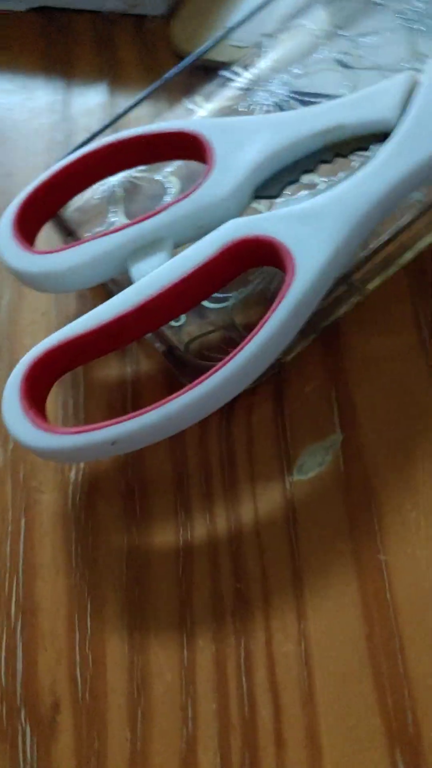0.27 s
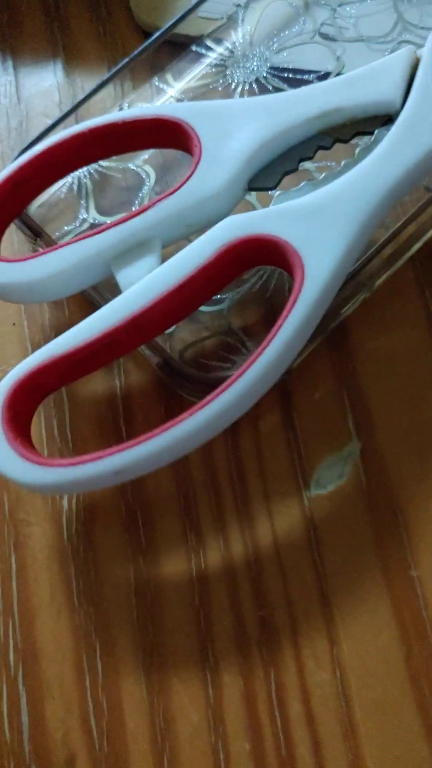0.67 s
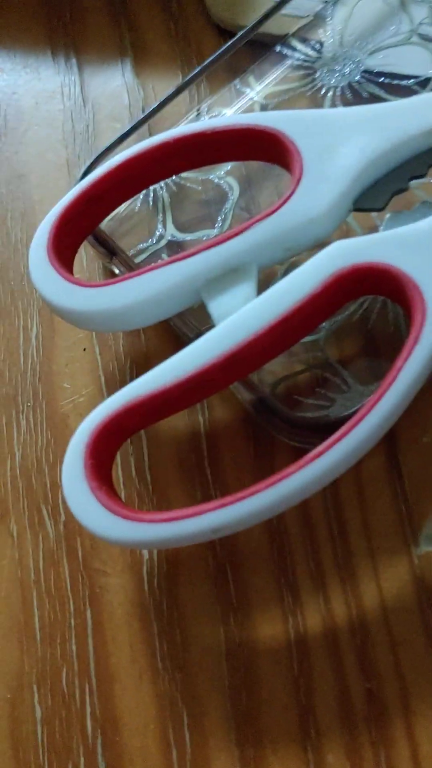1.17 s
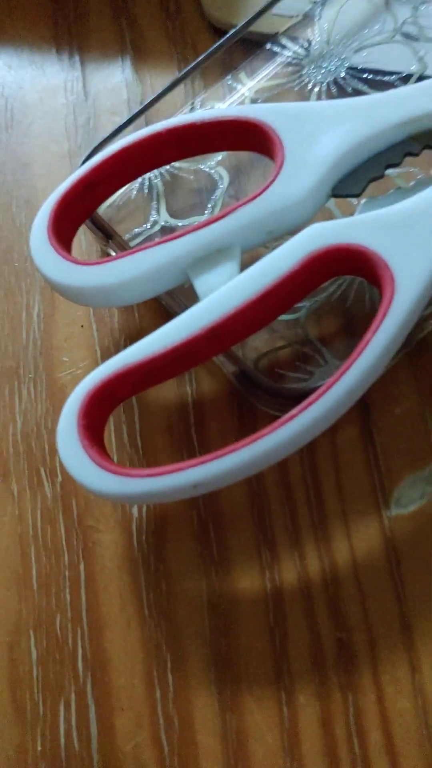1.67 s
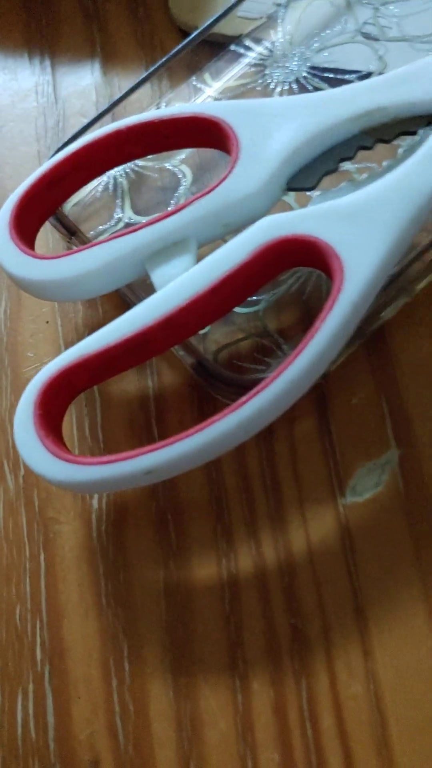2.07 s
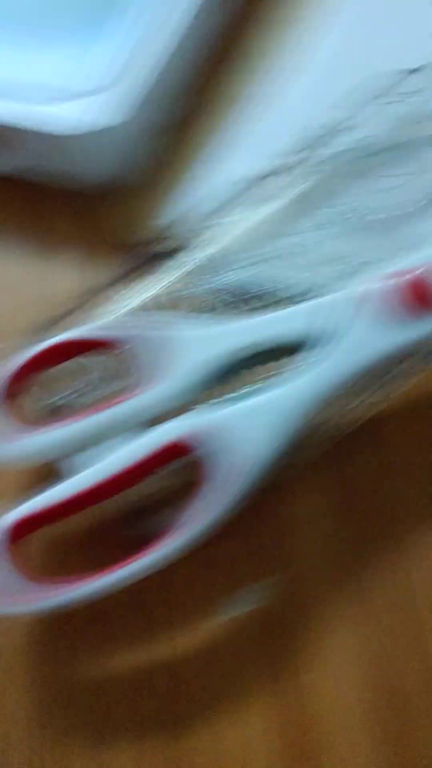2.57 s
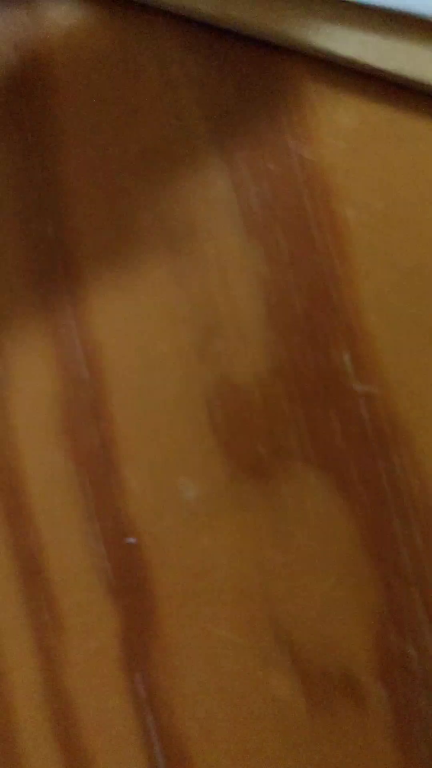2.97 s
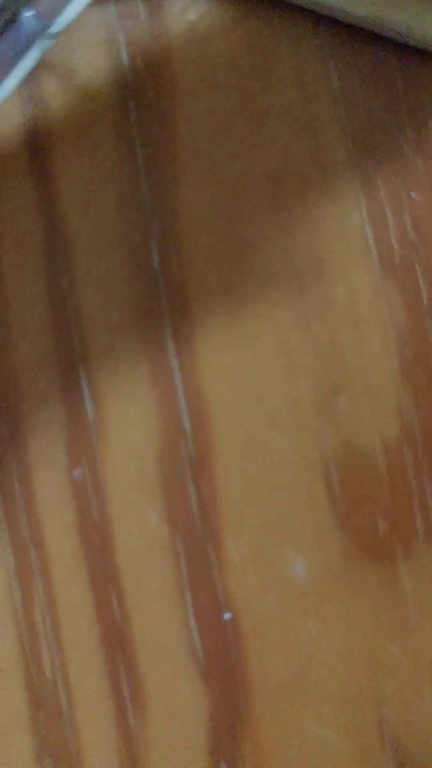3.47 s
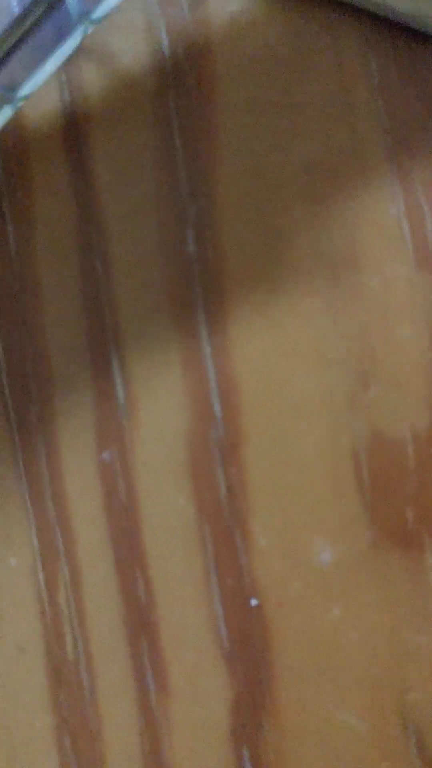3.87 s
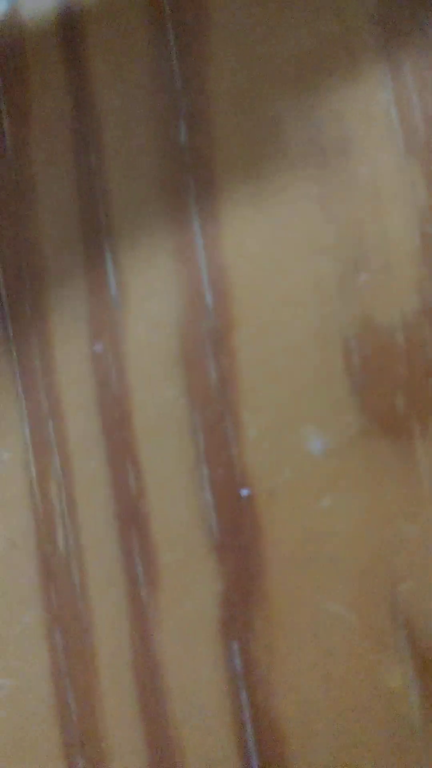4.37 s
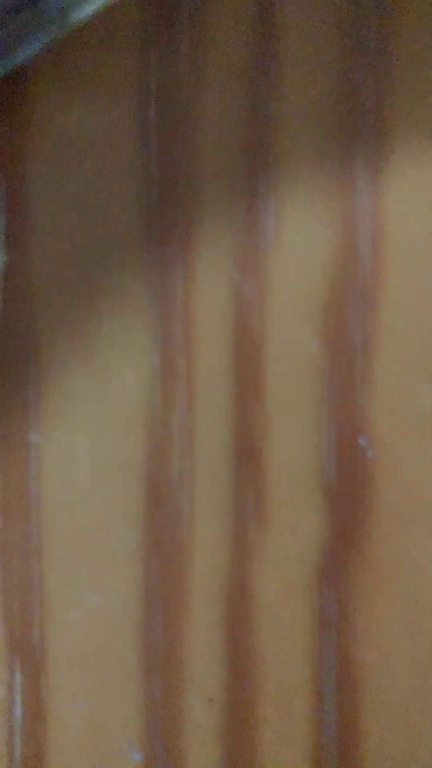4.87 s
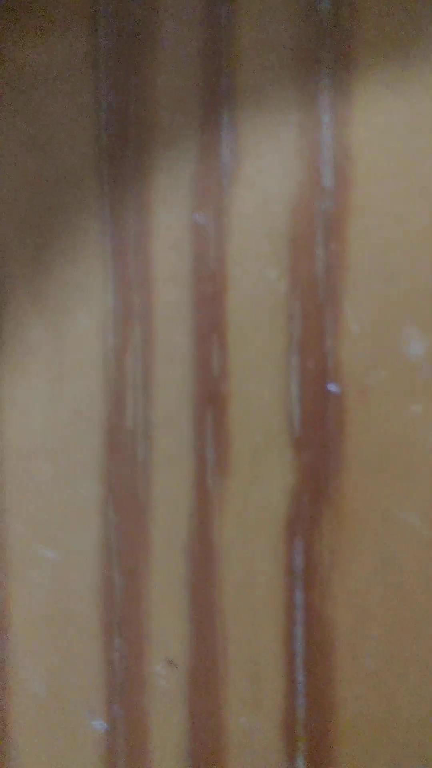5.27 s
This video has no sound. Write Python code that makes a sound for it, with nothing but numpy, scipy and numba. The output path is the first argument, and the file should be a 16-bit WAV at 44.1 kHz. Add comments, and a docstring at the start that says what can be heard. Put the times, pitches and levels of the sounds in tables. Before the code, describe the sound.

Stereo, close and dry, with only a short room echo. First, soft scrapes and isolated hollow plastic clicks over a low wavering room hum, with light thuds through the table. After a nearly still moment, a heavy thump and sharp snaps begin the crinkling of thin plastic film, which comes in dense clumps with quieter gaps and leans mostly to the right.

```python
"""From the first moment, a small quiet room hums and hisses around a hand-held phone with two sound ports.
A hard plastic capsule is turned, tapped and snapped open just beside it: fingers scrape and squeak on the
hollow shell, each snap rings a small stiff patch for a few cycles, and knocks boom in the table top.
From about 3.7 s thin wrappers crinkle and tear, in clumps of tiny snaps that ring patches of film.
The two ports hear the handling with a small lag and a different level."""
import sys
import numpy as np
from scipy import signal
from scipy.fft import rfft, irfft
from scipy.io import wavfile
from scipy.ndimage import uniform_filter1d
from numba import njit

SR = 44100
rng = np.random.default_rng(int(sys.argv[2]) if len(sys.argv) > 2 else 0)


def pcm_store(signal):
    """Save signal as 16-bit PCM."""
    levels = np.round(np.clip(np.atleast_2d(signal), -1, 1) * 32767)
    wavfile.write(sys.argv[1], SR, levels.astype(np.int16).T)


def invert_db(x):
    """Field ratio 10**(x/20) for x, a level in decibels (scalar or array-like)."""
    u = np.asarray(x, float) / 20
    return 10 ** u


N = 244314  # length in samples

# background level, which swells and dips: time_s, level_db
BACKGROUND_LEVEL = [(0, -61), (.85, -59.5), (.92, -63), (.97, -54), (1.13, -54.5), (1.18, -69),
                    (1.42, -65.5), (1.5, -55), (1.7, -63), (2.3, -61.5), (2.55, -59), (3.1, -56.5),
                    (3.45, -61.5), (3.74, -59), (3.8, -51), (4.1, -51.5), (4.75, -66), (4.91, -52),
                    (5.54, -56)]
# colour of the room tone: freq_hz, gain_db
ROOM_TONE_COLOUR = [(12, -52), (20, -16), (43, -6), (86, -14), (117, -11), (212, -22.5), (332, -15.5),
                    (404, -37), (440, -25), (479, -28.5), (888, -38.5), (966, -41.5), (1320, -38),
                    (15200, -63.5), (16500, -54)]
# wavering hum lines at fixed pitches: pitch_hz, middle_level_db (sine peak compared with the room tone)
HUM_LINES = [(118.4, -1.5), (382, -13), (436, -17), (958, -23.5)]
# colour of the ports' own hiss: freq_hz, gain_db
HISS_COLOUR = [(2000, -13.5), (5000, -9), (6800, -37.5), (9000, -20), (11200, -22), (12200, 24), (15800, 1),
               (16800, -19.5)]
# colour of the room's echo: freq_hz, gain_db
ECHO_COLOUR = [(200, -5), (600, 5), (2000, -1), (4000, 1), (7000, 0), (10000, -20), (16000, -21)]
# where the hands are: time_s, left_port_delay_ms, left_minus_right_db
HAND_PLACE = [(0, -0.092, -2), (.7, -0.34, -5.5), (1.0, -0.32, 1), (1.4, -0.083, -1.5), (2.0, -0.068, 0),
              (2.5, 0.14, -1.5), (3.0, 0.19, -5), (3.4, .3, -5.5), (4.2, 0.3, -4.5), (4.7, 0.23, -7.5),
              (5.2, 0.34, -6)]
# how differently the ports colour close sounds: freq_hz, left_minus_right_db
PORT_TILT = [(100, 3), (300, -2.5), (700, -1.5), (1300, -4), (2400, 2.5), (4400, 2), (8000, 6),
             (15000, 1.5)]
# knocks felt through the table and hand: start_s, level_db, pitch_hz, t60_s (time to fade by 60 dB)
KNOCKS = [(0.946, -40, 226, 0.055), (1.592, -39, 308, 0.14), (2.52, -40.5, 128.6, 0.22),
          (2.91, -38.5, 282, 0.057), (3.191, -43.5, 138, 0.044), (3.636, -26, 124, 0.012),
          (3.772, -24.5, 125, 0.32), (3.836, -27, 115, 0.05), (3.88, -30.5, 126.5, 0.091),
          (4.019, -35.5, 118, 0.063), (4.058, -36, 127, 0.11), (4.211, -35, 305, 0.15),
          (4.468, -38, 174, 0.035), (4.867, -37, 248, 0.12)]
# short squeaks of skin on the shell: middle_s, half_length_s, pitch_hz, level_db
SQUEAKS = [(1.736, 0.026, 1340, -57), (1.773, 0.015, 1350, -53), (2.116, 0.045, 774, -49.5),
           (2.549, .05, 615, -55)]
# ringing modes of the hollow shell: pitch_hz, width_hz, relative_level_db
SHELL_MODES = [(576, 42, -1), (740, 150, 4), (1260, 150, -4), (1640, 200, -8.5), (1964, 470, -4),
               (2630, 51, 0), (3360, 53, -29), (4480, 91, -7), (5170, 50, -1)]
# treble colour of skin and shell: freq_hz, gain_db
FRICTION_COLOUR = [(3000, -6), (4030, -5), (4400, -1.5), (6730, 4.5), (7490, -6.5), (10800, -11.5),
                   (12200, -12.5), (14500, 1), (16100, -41), (16800, -50)]
# finger strokes on the shell: peak_s, level_db, rise_s, fall_s (for 20 dB), treble_db (compared with
# level), loudest_hz
STROKES = [(0.0, -43, .01, 0.14, -25, 1574), (0.85, -69.5, 0.59, 0.1, -11, 700),
           (0.956, -44.5, 0.011, 0.14, -18, 1580), (1.476, -49, 0.019, 0.098, -6, 1600),
           (1.565, -41.5, 0.065, 0.11, -24, 1360), (1.649, -48, .1, 0.029, -1, 1490),
           (1.735, -62.5, 0.088, 0.22, -0.5, 1290), (1.839, -48.5, 0.071, 0.14, -13, 800),
           (1.982, -45, 0.03, 0.03, -6.5, 2680), (2.114, -44.5, 0.02, 0.073, -15, 1820),
           (2.162, -38, 0.048, 0.033, -3.5, 2150), (2.342, -53.5, 0.05, .08, -29, 580),
           (2.384, -47, 0.017, 0.1, -8, 920), (2.453, -46, 0.065, 0.02, -18, 885),
           (2.53, -63, .04, 0.041, -4, 1820), (2.669, -54.5, 0.11, 0.1, -7, 1450),
           (2.758, -50.5, 0.065, 0.089, -10, 1140), (2.949, -40, 0.11, 0.22, -17.5, 1100),
           (3.05, -48.5, .2, 0.069, -1.5, 1560), (3.112, -46, 0.11, 0.037, -29, 1164),
           (3.21, -47.5, 0.027, .16, -21, 1600), (3.595, -42, 0.08, 0.08, -34, 1570)]
# light contact between strokes: from_s, to_s, level_db, treble_db (compared with level), loudest_hz
LIGHT_TOUCH = (2.3, 3.72, -68.5, -6, 1196)
# crunches of wrapper film: peak_s, level_db, rise_s, fall_s (for 20 dB), treble_db (compared with level)
CRUNCHES = [(3.775, -20, 0.023, 0.035, -8.5), (3.83, -39, 0.022, 0.32, -11.5), (3.957, -38, 0.16, 0.16, 7),
            (4.057, -35, 0.097, 0.13, -12.5), (4.223, -17, .033, 0.027, -5.5), (4.26, -42, 0.027, 0.1, -8),
            (4.386, -33, 0.061, 0.041, -13.5), (4.617, -49.5, 0.56, 0.097, -6),
            (4.727, -44, 0.054, 0.081, -13), (4.952, -45, 0.15, 0.28, -12), (5.069, -43.5, .1, 0.051, -7),
            (5.184, -20, 0.022, 0.068, -3), (5.342, -34.5, 0.052, 0.16, 1), (5.43, -42.5, 0.22, 0.046, 2),
            (5.539, -35, 0.033, .1, -4.5)]
# light rustle between crunches: from_s, level_db, treble_db (compared with level)
LIGHT_RUSTLE = (3.75, -53, -2.6)
# colour of the film's broad crinkle: freq_hz, gain_db
FILM_COLOUR = [(120, -45.5), (200, -7), (993, -1), (2440, -1), (2850, -6), (4500, -16), (5850, -30.5),
               (9900, -120)]
# treble colour of cracking film: freq_hz, gain_db
CRACK_COLOUR = [(1760, -9.5), (3000, 6), (3180, -4.5), (3490, 2), (4210, -8), (4560, 2), (5260, -4),
                (6770, -0.5), (7440, -5.5), (8590, -1.5), (11100, -16.5), (12100, -7.5), (15000, -3),
                (15900, -27), (16800, -47.5)]
# clear snaps of shell and film: time_s, level_db, patch_hz, crack_db (compared with the ring's peak),
# left_minus_right_db
SNAPS = [(0.0296, -34, 1120, -20, -6), (0.166, -36.5, 770, -32, 1), (0.9481, -20.5, 1610, -1, 5.5),
         (0.9599, -31, 1640, -4, 6), (1.0372, -31, 1260, -15, 3), (1.0623, -34.5, 810, -5, 4),
         (1.072, -33, 1760, -12, 3), (1.5023, -26, 1600, -24, -3), (1.5276, -27.5, 1390, -35, -3),
         (1.5509, -19, 1600, -40, -5.5), (1.5652, -35, 1600, -20, -7), (1.5926, -11.5, 1040, -15.5, 1),
         (1.8046, -27, 1380, -13, -10), (2.1203, -31.5, 1980, 4.5, 2), (2.141, -30.5, 1490, -19, -5),
         (2.154, -17, 2270, -0.5, 2.5), (2.174, -28, 2320, 6, 0), (2.4354, -31.5, 1040, -25, -7),
         (2.5173, -48, 2220, -6, 9), (2.6582, -28, 1400, -18, -3), (2.7552, -34.5, 980, -14, -11.5),
         (2.9306, -23, 1260, -34, -11), (2.9565, -30.5, 790, -19, -3), (2.969, -30, 1000, -10, -5),
         (2.985, -29, 1350, -12, 8), (3.0362, -15.5, 1800, -48, 5.5), (3.0999, -33.5, 970, -10, -8.5),
         (3.2028, -6.5, 1990, 3.5, -7.5), (3.2256, -37, 1310, 11, 2), (3.3332, -59, 1370, 13, -10.5),
         (3.442, -46.5, 2100, 3.5, -8.5), (3.5815, -18.5, 1980, -10, -15), (3.5948, -33, 2700, 10, -8),
         (3.7649, -3, 1630, 0, -1), (3.7794, -8, 1610, -14, -11), (3.7896, -9.5, 1970, -2, -4),
         (3.8017, -5, 1910, -2.5, -5.5), (3.8382, -20, 935, -8, -4.5), (3.8532, -22.5, 1540, -3, -10),
         (3.8901, -23.5, 1660, -6.5, -6.5), (3.9374, -24, 2670, 6, -4), (3.9456, -20.5, 2620, 7, -7.5),
         (3.9668, -21.5, 2660, 12, -5), (3.9715, -24, 2260, 3, -13.5), (3.9821, -26, 1920, -1, -20.5),
         (3.9965, -19.5, 1730, 1.5, -4), (4.0052, -21.5, 1780, -5, -12), (4.0392, -20, 2020, -6, -5),
         (4.0455, -16, 2442, -11, -12), (4.0615, -20.5, 2250, 1.5, -11), (4.066, -18, 2270, 4, -7),
         (4.0862, -25, 1900, 5, -9), (4.097, -18.5, 2800, 11.5, -6), (4.1197, -16.5, 1620, 3, -11.5),
         (4.1355, -29, 2040, 9.5, 1), (4.1575, -17, 1520, 5.5, -8), (4.1697, -24, 1580, 3.5, -18),
         (4.1876, -26, 1460, 9.5, -5), (4.2131, -9, 1350, -18, -11.5), (4.2251, -5.5, 1390, 2, -6.5),
         (4.2317, -8, 1500, -4, -7), (4.3675, -21.5, 970, -20, -16.5), (4.3749, -12, 1916, -15, -8.5),
         (4.3837, -16.5, 1300, -4.5, -16), (4.3981, -24.5, 3130, 12.5, -1.5), (4.409, -26, 1890, 9.5, -18),
         (4.4779, -13.5, 2860, -6.5, -10.5), (4.6081, -12, 1515, -19.5, -8.5), (4.662, -33, 1050, -6, -6),
         (4.7145, -8, 1360, -39, 3.5), (4.7304, -27, 2000, -2.5, -3), (4.79, -33, 1840, -3.5, -13),
         (4.8744, -18, 1430, -15, -9), (4.9121, -19, 1550, -17.5, -4), (4.9353, -22, 930, -36, -8.5),
         (5.0692, -14, 1410, 3.5, -8), (5.132, -29, 2800, -2, 0), (5.1426, -18.5, 1480, -3.5, -5.5),
         (5.1662, -13.5, 3300, 2, -8), (5.1718, -8, 2560, -3, -1), (5.1749, -0.5, 1770, -5, 6.5),
         (5.1798, -2.5, 2800, -25, 2), (5.1873, -6, 1510, -18, -3), (5.2041, -7.5, 1180, -4, 7),
         (5.2085, -9, 1510, -1, -7), (5.2204, -10.5, 1580, -2, -3), (5.2426, -6, 1420, -15, -5),
         (5.279, -30.5, 2020, 18, -6), (5.298, -9, 1630, -24, -1), (5.3106, -21.5, 2330, 3.5, -19),
         (5.3252, -12.5, 2060, 0.5, -3), (5.342, -15, 2270, -6, -11.5), (5.3535, -26.5, 1550, 4.5, -7),
         (5.363, -24.5, 3530, 7.5, -5), (5.3718, -22, 2100, 1.5, 8), (5.4225, -18, 1190, -3, -5),
         (5.4967, -16, 1320, 0.5, -2.5), (5.508, -25.5, 1930, 3, -17), (5.5364, -21, 1500, -3, 7)]


def unit(x):
    """Scale to an rms (average strength) of 1."""
    return x / np.sqrt(np.mean(x ** 2))


def curve(table):
    """Read a time table as smooth columns, one value a sample."""
    s, *columns = np.transpose(table)
    return [np.interp(np.arange(N) / SR, s, c) for c in columns]


def colour(x, points):
    """Filter through (Hz, dB) points without sounding early, using the cepstrum of the log gain."""
    size = min(4096, x.shape[1])
    hz, db = np.transpose(points)
    bins = np.arange(size // 2 + 1) * SR / size + 1
    gain = invert_db(np.interp(np.log(bins), np.log(hz), db))
    cepstrum = irfft(np.log(gain))
    # fold the later half onto the earlier half, so the filter starts at once
    cepstrum[1:size // 2] *= 2
    cepstrum[size // 2 + 1:] = 0
    response = irfft(np.exp(rfft(cepstrum)))[None, :size // 2]
    return signal.oaconvolve(x, response, axes=1)[:, :x.shape[1]]


def views(count, alike):
    """Noise as two ports hear it: a shared part (alike, 0 to 1, of the power) and a part of their own."""
    shared, *own = rng.standard_normal((3, count))
    return np.sqrt(alike) * shared + np.sqrt(1 - alike) * np.array(own)


@njit
def moving_band(x, hz, damp):
    """State-variable band-pass whose centre moves; gain 1 at the centre, wider with more damping."""
    y, band, low = np.empty(len(x)), 0., 0.
    for i in range(len(x)):
        g = np.tan(np.pi * hz[i] / SR)
        v = (band + g * (x[i] - low)) / (1 + g * (g + damp))
        band, low, y[i] = 2 * v - band, low + 2 * g * v, damp * v
    return y


def ports(x, pan_db):
    """Place one source at two ports, with a level difference and a delay that follows the hands."""
    delay = np.round(curve(HAND_PLACE)[0] * SR / 1000).astype(int)
    late = np.clip(np.arange(N) - delay, 0, N - 1)
    return np.array([x[0, late] * invert_db(pan_db / 2), x[1] * invert_db(-pan_db / 2)])


def port_colour(x):
    """Close sounds reach each port with its own colour, so the tilt is split between them."""
    left = colour(x[:1], [(hz, db / 2) for hz, db in PORT_TILT])
    right = colour(x[1:], [(hz, -db / 2) for hz, db in PORT_TILT])
    return np.vstack([left, right])


def swells(rows, between, db, *rest):
    """Add the powers of overlapping swells and a steady touch; other columns follow the loudest swell."""
    t = np.arange(0, N, 16) / SR
    touching = (t > between[0]) & (t < between[1])
    power = invert_db(2 * db) * touching + 1e-12
    sums = [power * v for v in rest]
    for s, peak_db, rise, fall, *values in rows:
        away = np.where(t < s, (s - t) / max(rise, .003), (t - s) / max(fall, .003))
        p = invert_db(2 * (peak_db - 20 * away))
        power = power + p
        sums = [a + p * v for a, v in zip(sums, values)]
    averages = [a / power for a in sums]
    return curve(np.transpose([t, 10 * np.log10(power), *averages]))


def background():
    """Room tone nearly alike at both ports in the bass, faint wavering machine lines and steady port hiss."""
    level_db = curve(BACKGROUND_LEVEL)[0]
    mid, side = colour(rng.standard_normal((2, N)), ROOM_TONE_COLOUR)
    # the louder swells are handling rumble, which the ports share less
    grip = np.clip((level_db + 62) / 16, .15, .9)
    high_pass = signal.butter(1, 450., "high", fs=SR, output="sos")
    side = grip * side + signal.sosfilt(high_pass, side)
    tone = unit(np.array([mid + side, mid - side]))
    t = np.arange(N) / SR
    # slow random wobble of each line's level, about 4.3 dB rms
    waver = uniform_filter1d(rng.standard_normal((len(HUM_LINES), N)), 4000) * 60.
    hum = np.zeros(N)
    for (hz, db), w in zip(HUM_LINES, waver):
        hum += invert_db(db + 4.3 * w) * np.sin(2 * np.pi * hz * t)
    hiss = invert_db(-83) * unit(colour(rng.standard_normal((2, N)), HISS_COLOUR))
    return invert_db(level_db + np.array([[1.0], [-1.0]])) * (tone + hum) + hiss


def room(x):
    """Echo as a diffuse tail of fading noise, different at each port."""
    t60_s, echo_db = 0.17, -12.5
    t = np.arange(int(.4 * SR)) / SR
    fade = np.exp(-np.log(1000) * t / t60_s) * (1 - np.exp(-t / 0.0039))
    tail = rng.standard_normal((2, len(t))) * fade
    tail = colour(tail / np.sqrt(np.sum(tail ** 2) / 2), ECHO_COLOUR)
    return invert_db(echo_db) * signal.fftconvolve(x, tail, axes=1)[:, :N]


def knocks():
    """Soft, shaky blows ring a low mode of the table top; the far port feels it a little out of step."""
    out, t = np.zeros((2, N + 8192)), np.arange(8192) / SR
    for s, db, hz, t60 in KNOCKS:
        smooth = uniform_filter1d(uniform_filter1d(views(len(t), 0.68), 200), 200)
        shake = 0.9 * unit(smooth)  # random phase, radians
        swing = np.sin(2 * np.pi * hz * t - np.array([[0], [.6]]) + shake)
        fade = np.exp(-np.log(1000) * t / max(t60, .01)) * (1 - np.exp(-t / 0.0047))
        ring = swing * fade
        i = int(s * SR)
        out[:, i:i + len(t)] += invert_db(db) * ring / abs(ring).max()
    return out[:, :N] * invert_db([[1.0], [-1.2]])


def squeaks():
    """Narrow, breathy tones: noise in one sharp mode that swells and dies."""
    out = np.zeros((2, N))
    for s, half_length, hz, db in SQUEAKS:
        count = int(2 * half_length * SR)
        tone = signal.lfilter(*signal.iirpeak(hz, hz / 58.0, SR), views(count, 0.47))  # 58 Hz wide
        i = int((s - half_length) * SR)
        out[:, i:i + count] += invert_db(db) * unit(tone) * np.hanning(count)
    return ports(out, -1.0)


def shell(x):
    """The hollow capsule adds its own ringing modes to whatever excites it."""
    rings = np.zeros_like(x)
    for hz, width, db in SHELL_MODES:
        rings += invert_db(db) * signal.lfilter(*signal.iirpeak(hz, hz / width, SR), x)
    return x + invert_db(3.0) * rings


def scraping():
    """Smooth skin friction; its loudest region moves with the grip and the shell modes colour it."""
    db, treble_db, hz = swells(STROKES, LIGHT_TOUCH[:2], *LIGHT_TOUCH[2:])
    slip = invert_db(3.46 * unit(uniform_filter1d(rng.standard_normal(N), 250)))  # the skin grips and lets go
    rub = slip * views(N, 0.63)
    low = unit(np.array([moving_band(moving_band(v, hz, 0.77), hz, 2.24) for v in rub]))
    high = unit(colour(views(N, 0.5), [(1500, -41)] + FRICTION_COLOUR))
    mix = invert_db(db) * unit(shell(low)) + invert_db(db + treble_db) * high
    return ports(mix, curve(HAND_PLACE)[1])


def crinkling():
    """Clumps of tiny snaps, each ringing another patch of film; gentle handling mostly hisses."""
    db, treble_db = swells(CRUNCHES, (LIGHT_RUSTLE[0], N / SR), *LIGHT_RUSTLE[1:])
    force = np.clip((db + 54.0) / 16, .3, 1)
    clump = invert_db(3.7 * unit(uniform_filter1d(rng.standard_normal(N), 600)))
    hit = rng.random(N) < 250. * clump / SR  # 250 snaps a second, times the clumping
    strength = invert_db(1.5 * rng.standard_normal(N))
    smear = np.exp(-np.arange(300) / (.001 * SR))  # each snap dies over about 1 ms
    grains = force * unit(np.convolve(hit * strength, smear)[:N]) + 0.96  # 0.96 is the steady hiss
    patches = np.clip(1705.0 * np.exp(0.501 * rng.standard_normal(N)), 500, 5000)
    hz = patches[np.cumsum(hit)]  # a new patch at each snap
    broad = colour(grains * views(N, 0.59), FILM_COLOUR)
    low_ring = unit(np.array([moving_band(v, hz, 0.18) for v in broad]))
    low = unit(unit(broad) + 1.0 * low_ring)
    high = colour(grains * views(N, 0.13), CRACK_COLOUR)
    high_ring = unit(np.array([moving_band(v, 3 * hz, 0.089) for v in high]))
    high = unit(unit(high) + 1.12 * high_ring)
    return ports(invert_db(db) * (low + invert_db(treble_db) * high), curve(HAND_PLACE)[1])


def snaps():
    """A brief rough buckling rings a damped patch of plastic; a shorter crack carries the treble."""
    open_s = 3.4  # snaps before this ring with the shell modes, later ones are drier
    early_t60_s, late_t60_s = 0.015, .013
    out, pan = np.zeros((2, N + 2048)), np.zeros(N)
    t = np.arange(2048) / SR
    for s, db, hz, crack_db, pan_db in SNAPS:
        in_hand = s < open_s
        i, t60 = int((s - .0004) * SR), early_t60_s if in_hand else late_t60_s
        fade = (1 - np.exp(-t / 0.00026)) * np.exp(-np.log(1000) * t / t60)
        # a resonance peak around the patch pitch
        places = hz * np.array([.05, .17, .5, .88, 1, 1.14, 2, 4, 12])
        patch = list(zip(places, [-57.5, -19, -9.5, -5, 1.0, -5.5, -14.0, -25.5, -74.5]))
        ring = colour(views(len(t), 0.7) * fade, patch)
        tint = np.array(FRICTION_COLOUR if in_hand else CRACK_COLOUR, float)
        tint[:, 1] += 3.46 * rng.standard_normal(len(tint))  # every crack has its own colour
        crack = colour(views(len(t), 0.4) * fade ** 1.58, tint)
        snap = ring / abs(ring).max() + invert_db(crack_db) * crack / abs(crack).max()
        if in_hand:  # the capsule is still in the hand
            snap = shell(snap) * invert_db(-3.5)
        out[:, i:i + len(t)] += invert_db(db) * snap
        pan[max(i - 40, 0):] = pan_db  # holds until the next snap
    return ports(out[:, :N], pan)


def scene():
    """Hands at work, their echo, the table and the room tone."""
    near = port_colour(snaps() + scraping() + squeaks() + crinkling())
    echo = room(near.mean(0, keepdims=True))
    return near + echo + knocks() + background()


def roll_off(x):
    """The treble ends steeply here."""
    return signal.sosfilt(signal.butter(12, 16990, fs=SR, output="sos"), x)


def record(dry):
    """The port cavities ring near 6.7 kHz, and peaks stop just below full scale."""
    cavity = signal.lfilter(*signal.iirpeak(6750., 14., SR), dry)
    mix = np.clip(dry + 0.72 * cavity, -.99, .99)
    return roll_off(mix)


dry = scene()
out = record(dry)
pcm_store(out)
```